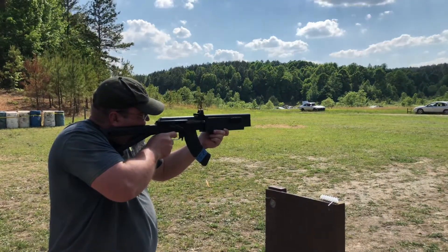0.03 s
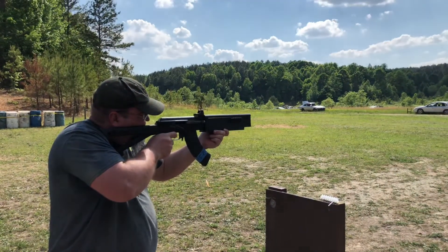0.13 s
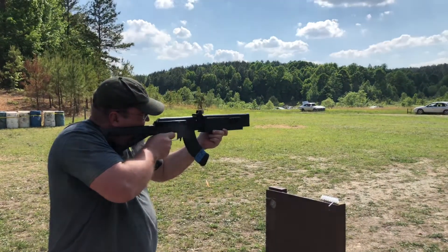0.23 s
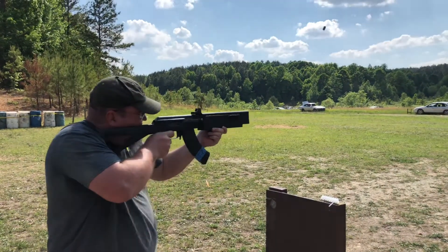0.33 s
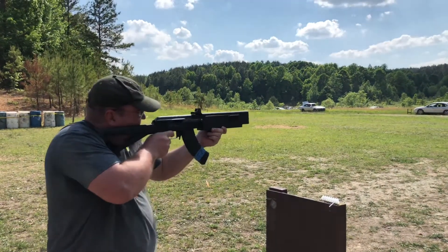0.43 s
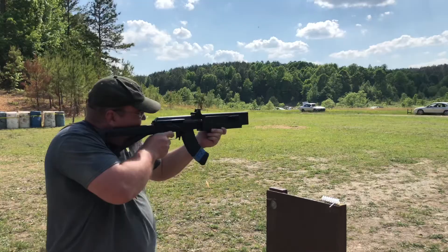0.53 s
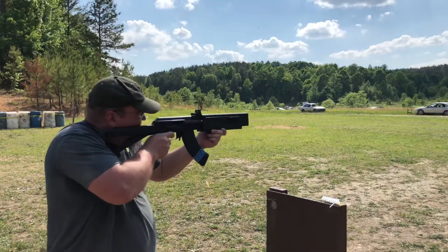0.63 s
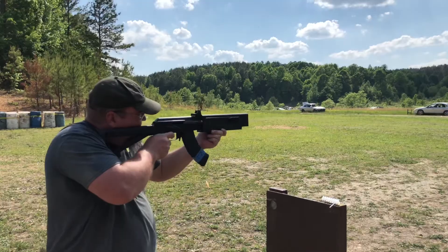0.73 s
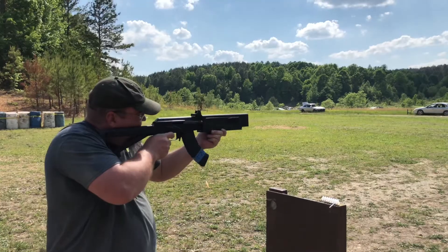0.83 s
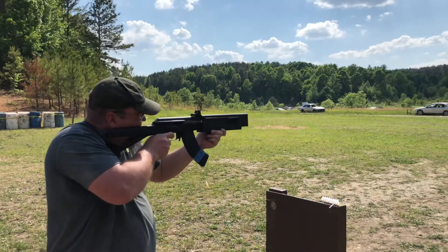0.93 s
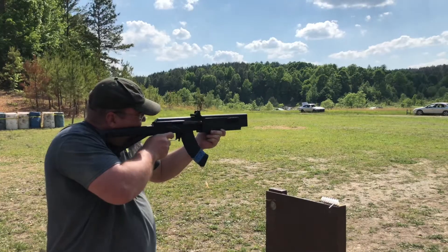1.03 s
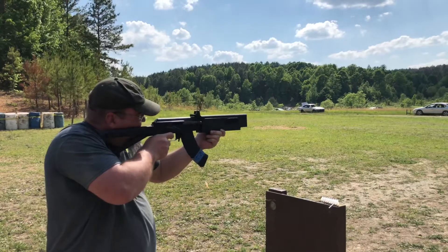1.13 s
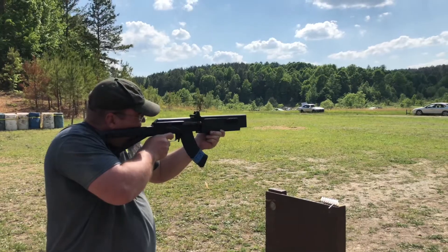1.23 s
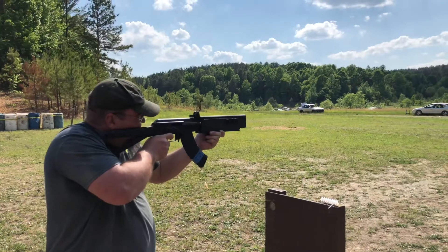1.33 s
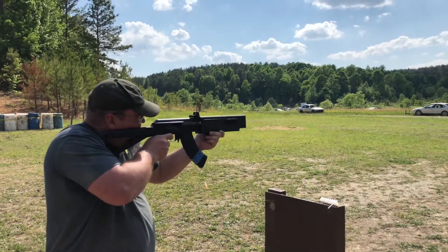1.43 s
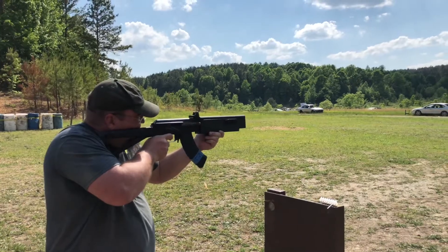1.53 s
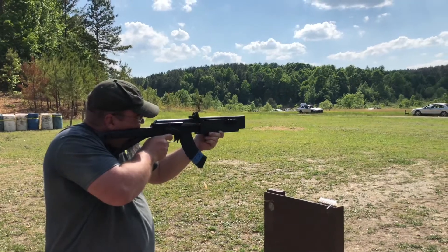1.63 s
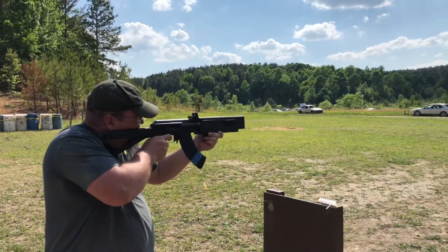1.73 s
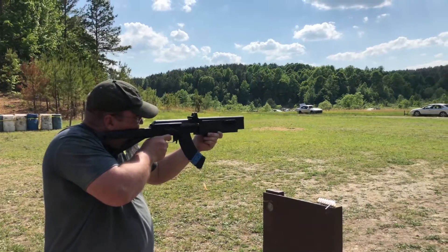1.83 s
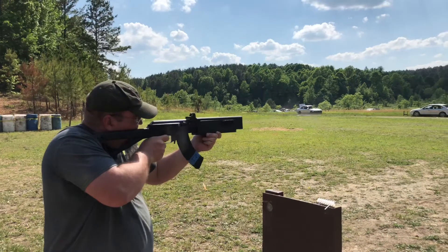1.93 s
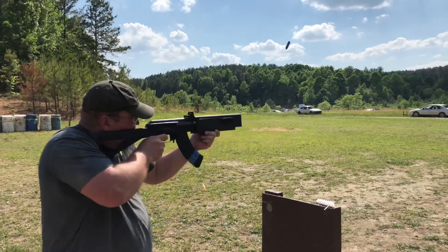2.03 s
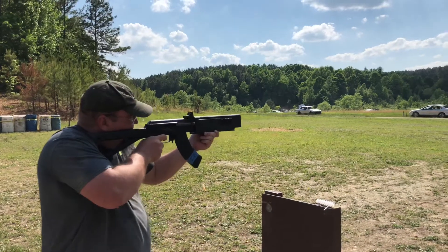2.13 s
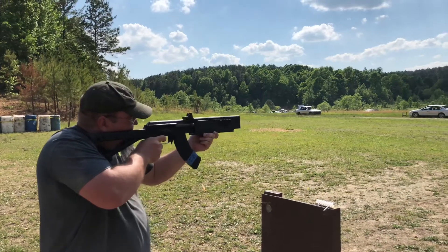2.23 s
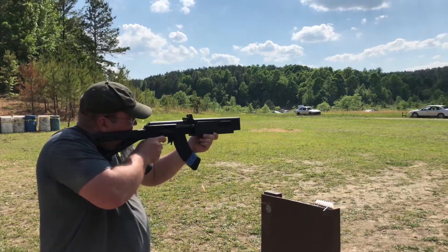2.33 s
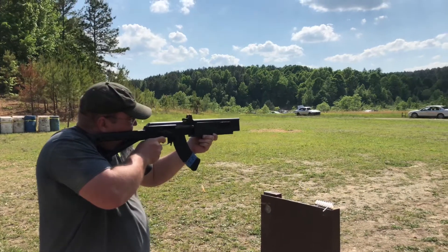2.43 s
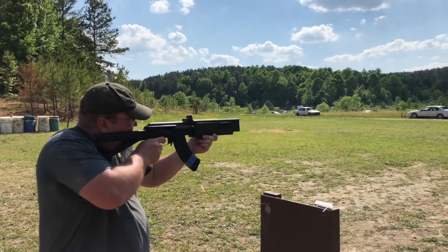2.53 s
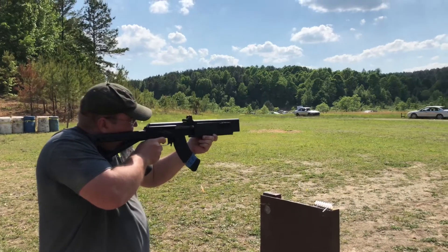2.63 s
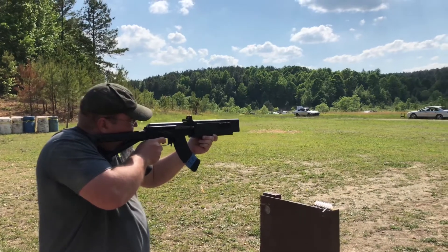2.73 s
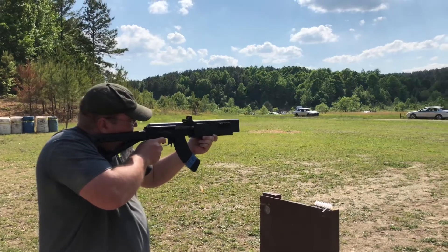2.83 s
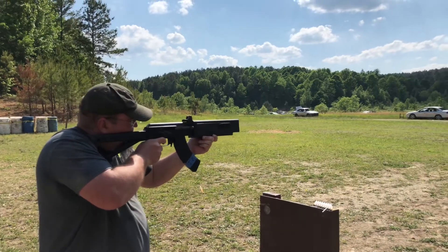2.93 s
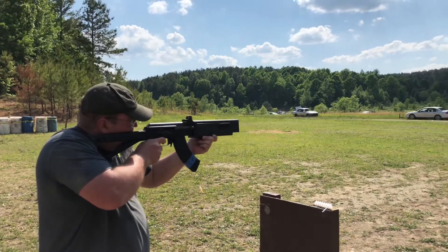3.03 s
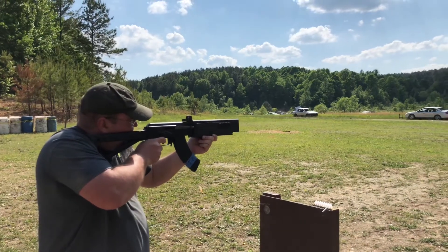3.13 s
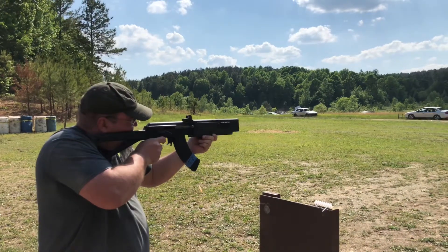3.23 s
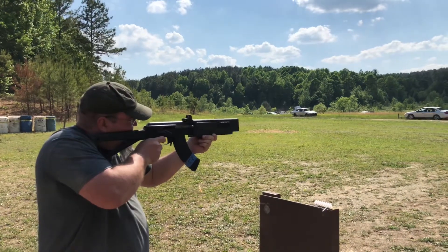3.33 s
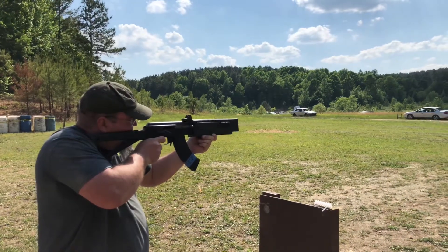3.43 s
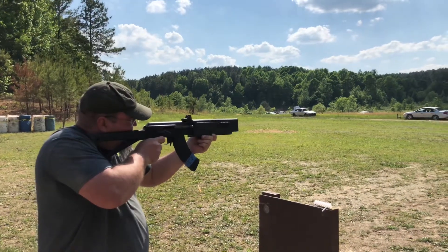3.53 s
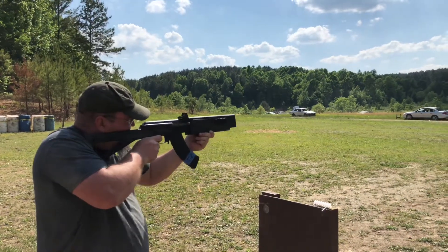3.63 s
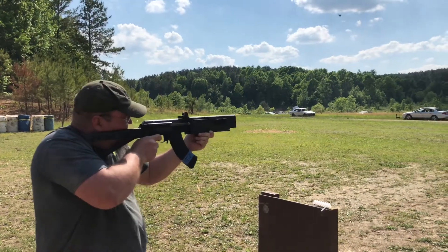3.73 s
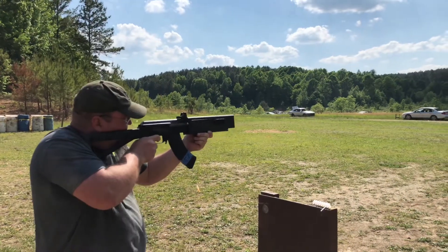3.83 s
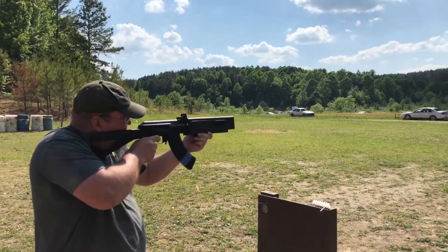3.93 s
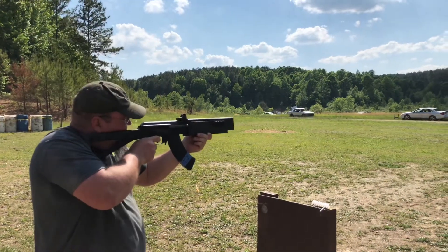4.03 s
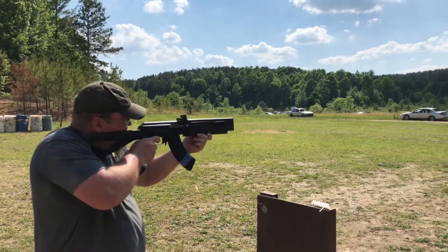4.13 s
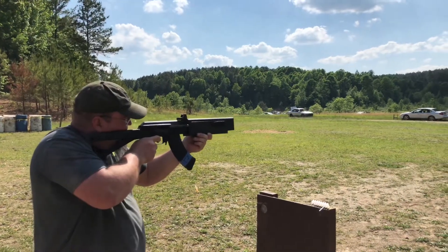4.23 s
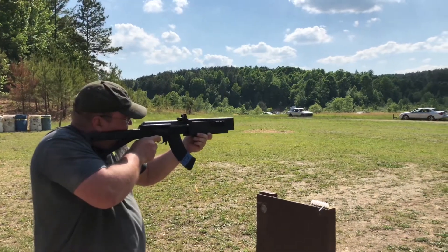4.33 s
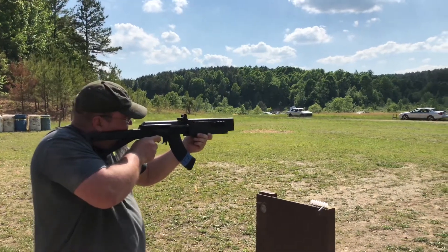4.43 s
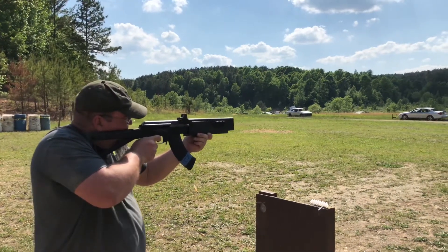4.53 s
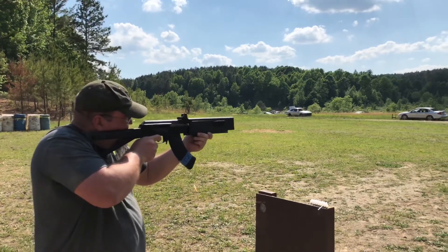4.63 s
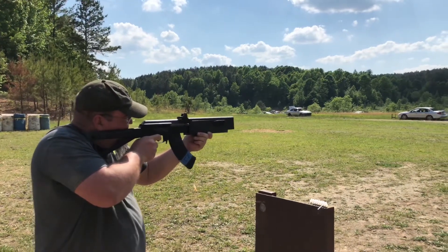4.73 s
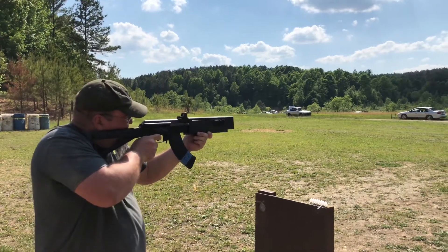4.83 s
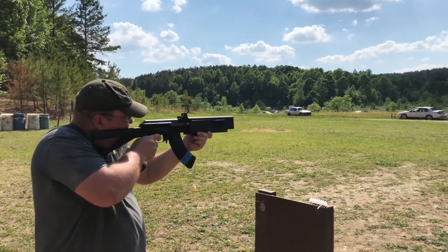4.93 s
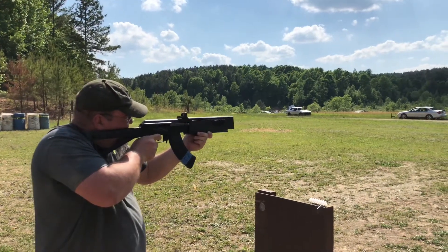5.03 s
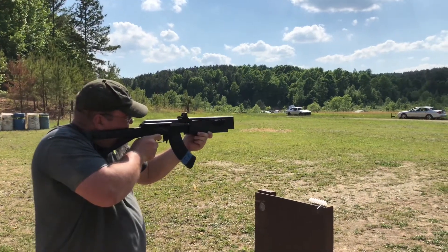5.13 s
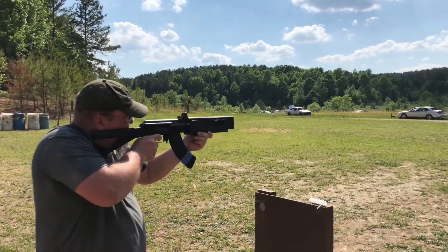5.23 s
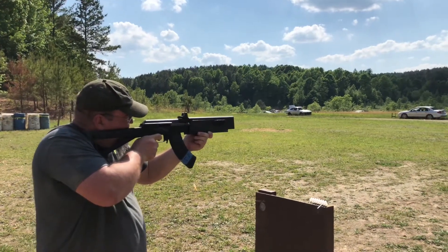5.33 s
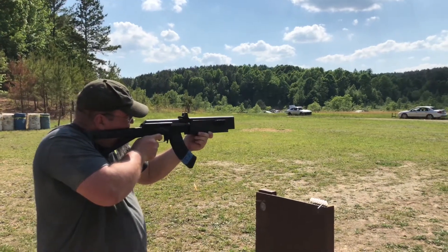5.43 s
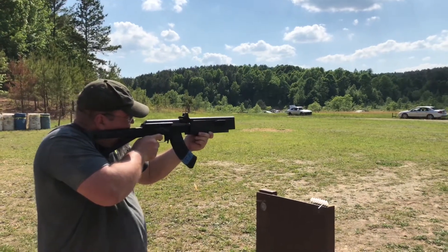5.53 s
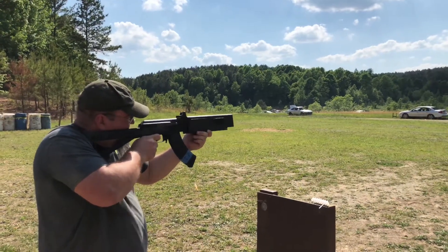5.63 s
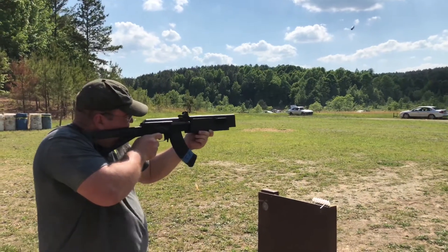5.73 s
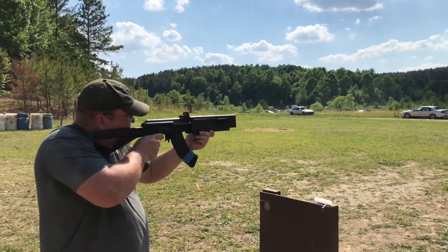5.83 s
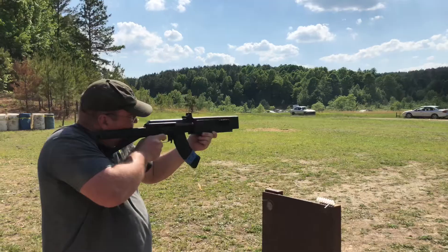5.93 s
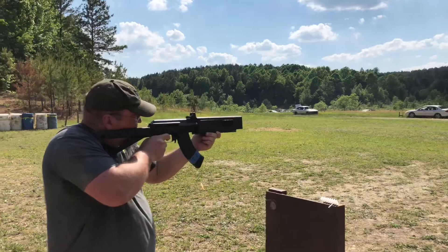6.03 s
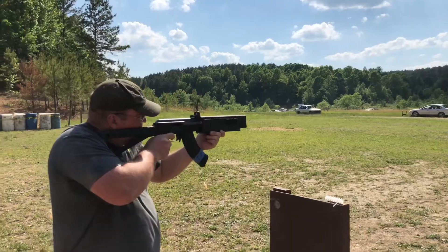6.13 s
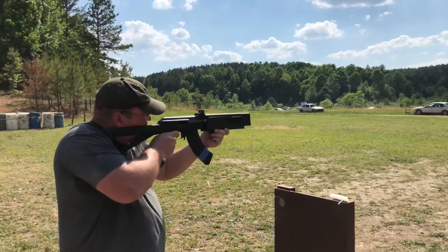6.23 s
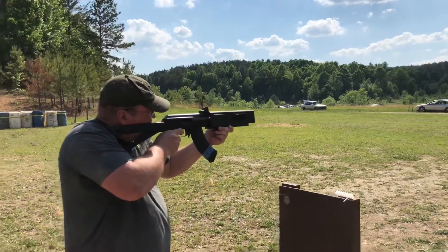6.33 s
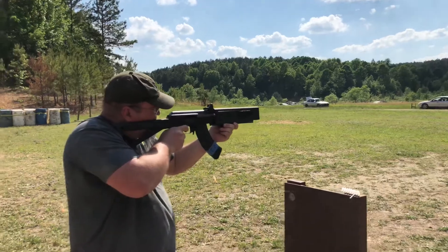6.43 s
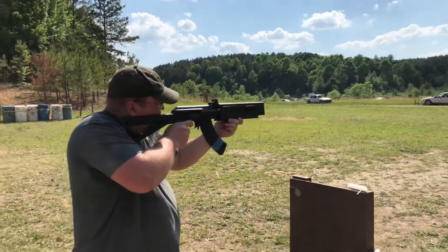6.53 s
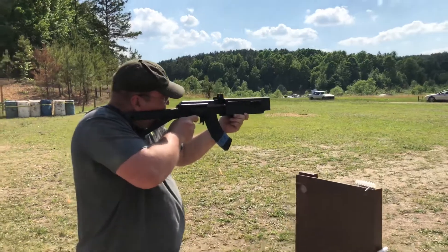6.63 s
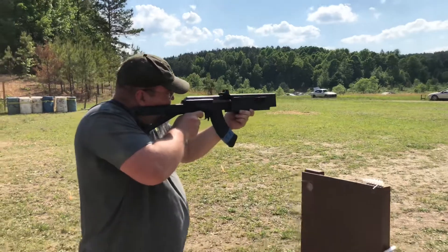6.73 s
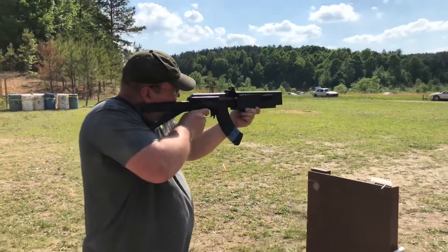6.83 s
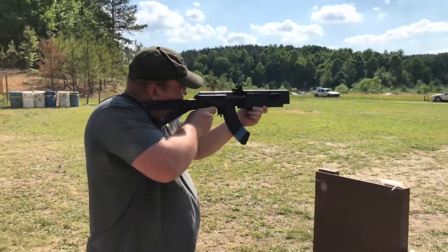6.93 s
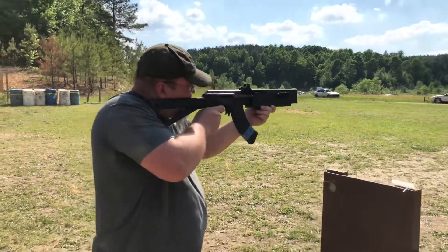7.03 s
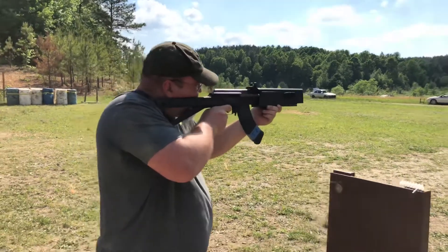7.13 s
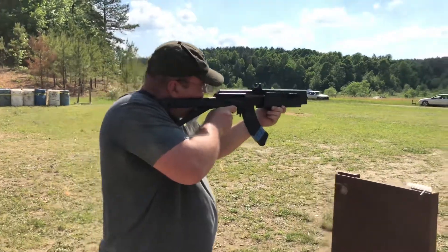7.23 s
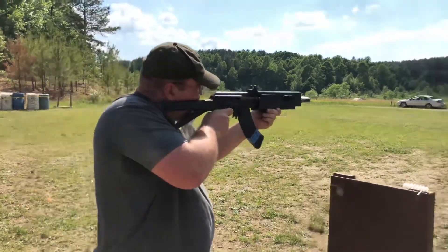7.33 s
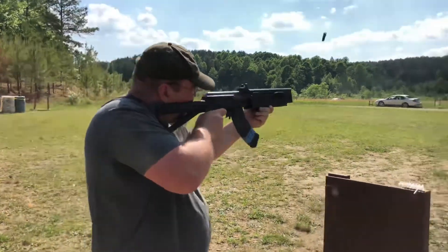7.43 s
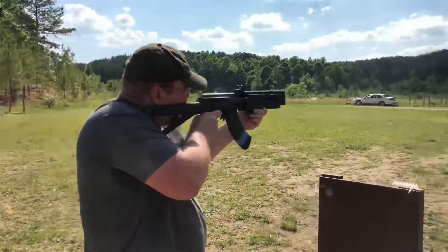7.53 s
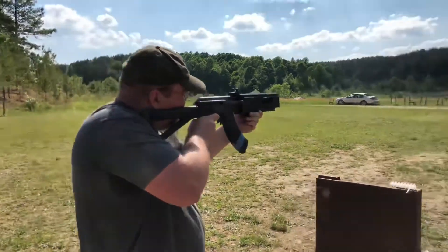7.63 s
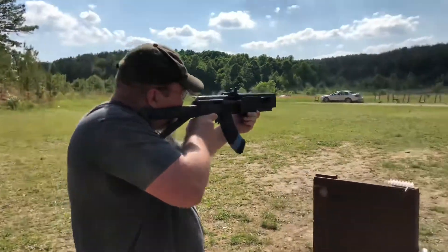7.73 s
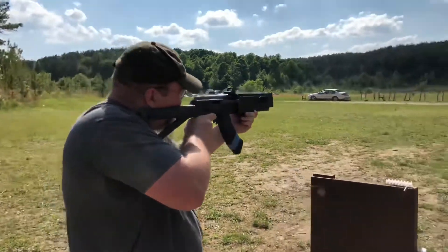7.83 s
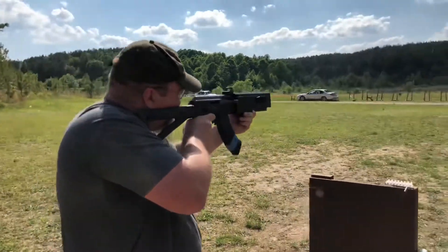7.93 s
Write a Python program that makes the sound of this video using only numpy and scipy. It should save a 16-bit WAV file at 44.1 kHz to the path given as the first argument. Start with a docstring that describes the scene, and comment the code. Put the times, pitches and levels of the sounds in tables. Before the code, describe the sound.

An open grassy range with quiet airy hiss, heard by one microphone near the shooter. Low wind buffets it unevenly, strongest at the start and around 5.4 s. A small bird gives quick, thin slurred whistles at 0-0.3 s and again, fainter, at 1.5-2 s. A suppressed self-loading rifle fires singly at 0.3, 2.0, 3.65, 5.7 and 7.45 s: a tiny hammer tick, a dry crack with a breathy gas burst and low push, then steel bolt clatter within a tenth of a second. A trigger click follows just after each shot. Bank and tree echoes slap and scatter over half a second; about 1.2 s later a wooded hill returns a dull, swelling roar, with sparse crackles and knocks before it. Spent cases ping thinly near 1.5 and 3.2 s, barely audible later. The last shot's echo is cut short at the end.

```python
"""Wind buffets the microphone as filtered noise and a small bird sings in gliding sines over a quiet field.
Then five single shots of a suppressed self-loading rifle: noise bursts for hammer, ignition, crack, gas and
bolt, a damped chamber ring and a low push. Scattered noise answers from a bank, the tree line and a far wooded
hill, with slaps, knocks and crackle. After each shot the trigger resets with a steel click; spent cases ping
on the ground as thin high sines with a tick."""
import sys
import numpy as np
from scipy import signal
from scipy.io import wavfile
from scipy.ndimage import map_coordinates

SR = 44100
rng = np.random.default_rng(int(sys.argv[2]) if len(sys.argv) > 2 else 0)


def generate_wav(sig):
    """Save sig (samples, or channels by samples) to the path in sys.argv[1] as 16-bit PCM at SR."""
    pcm = np.round(np.clip(np.atleast_2d(sig).T, -1, 1) * 32767).astype(np.int16)
    wavfile.write(sys.argv[1], SR, pcm)


N = 351918

# the shots: (time [s], crack trim [dB], suppressor ring trim [dB], hammer trim [dB], bolt trim [dB],
# near echo trim [dB], extra from the deep forest [dB], hill echo trim [dB], hill echo upper edge [Hz])
SHOTS = [(0.3185, -2, 3, 7.5, -2.5, 1.5, -1.5, 1, 1890), (2.0271, -1.64, 3.5, -1, -0.5, -2, 2.5, 0, 2467),
         (3.654, -3, 1.5, -3.5, -1.5, -2.5, 3.5, 1, 2370), (5.683, -3.5, -1, 3, -2.5, 0, .5, 0.5, 2440),
         (7.4577, -1.5, 3, -1.5, -1, -1, 2, 2, 2400)]
# colour of the action latching: (frequency [Hz], density [dB per Hz])
LATCH_TONE = [(100, -36), (400, -26), (700, -1), (1400, 3), (2400, -5.5), (3800, 7.5), (5200, -4.5),
              (6500, 3.5), (9000, 2), (12000, -2), (16000, -8)]

LEAD = .03  # s of each shot's sound ahead of its shot time, for the hammer and ignition
AGE = np.arange(int(2.7 * SR)) / SR - LEAD  # s after the shot
HILL_DELAY_S = 1.199


def rifle(crack_db, can_db, hammer_db, bolt_db):
    """One firing cycle: hammer, ignition, crack and gas, then the bolt back and home on ringing steel."""
    # bursts in firing order: (time after the shot [s], level before trims [dB], hold [s], decay time [s])
    hammer = [(-.0228, -32, .0015, 0.0015), (-.019, -36, .001, 0.0018), (-.0165, -30.5, .001, .002),
              (-.0132, -30.5, .002, 0.0042)]
    primer = [(-.0092, -42, .002, 0.0019), (-.007, -23, 0.0022, 0.0045)]
    crack = [(-.0014, -13.5, 0.0017, .001), (.0002, -3, 0.0018, 0.0017)]
    gas = [(.003, -9, 0.0035, .005), (.0105, -17.5, 0.0025, 0.0093)]
    bolt = [(.0275, -22.5, .004, .009), (.036, -34.5, .008, .01), (.044, -22, .006, 0.0086),
            (.0502, -24, 0.0024, .007), (.058, -21.5, .01, .008), (.092, -31.5, 0.0075, 0.065)]
    latch = [(.0695, -20, 0.01, .003), (.0742, -17, 0.0035, 0.0055), (.0795, -15.5, .0025, .0018)]
    # colours of the bursts: (frequency [Hz], density [dB per Hz])
    primer_tone = [(88, -39), (150, -0.5), (1600, -1), (2180, -3.5), (2980, -0.5), (4320, -9.5),
                   (5910, -6.5), (13200, -11.5), (16000, -16)]
    crack_tone = [(100, -26.5), (400, -14), (1250, -6), (2000, -13), (2800, -2.5), (3450, 2.5), (3900, -7),
                  (4450, 1), (5200, -5), (7000, -5.5), (8800, -0.5), (11000, -9.5), (16000, -13)]
    gas_tone = [(80, -4.5), (250, 1), (550, 4.5), (780, -2.5), (1050, 0.5), (1800, -13), (2400, -13.5),
                (5000, 2), (7000, -3), (9500, -0.5), (16000, -1)]
    bolt_tone = [(100, -14), (350, -12), (550, -4.5), (1000, -2.5), (1450, 4), (2000, -3.5), (3000, -0.5),
                 (4800, 2), (7500, -2), (11000, -4), (16000, -10)]

    muzzle = colour(bursts(crack), crack_tone) + colour(bursts(gas), gas_tone) + thump()
    ignition = colour(bursts(primer), primer_tone)
    blows = amp(hammer_db) * bursts(hammer) + amp(bolt_db) * bursts(bolt)
    sliding = colour(rattle(blows), bolt_tone)
    latching = colour(rattle(amp(bolt_db) * bursts(latch)), LATCH_TONE)
    action = amp(0.9) * steel(sliding, ring_db=-14) + amp(-3.0) * steel(latching, ring_db=-14)
    return amp(crack_db) * muzzle + amp(can_db) * suppressor() + ignition + action


def suppressor(size=1024):
    """Puffs of gas ring the short, strongly damped chambers of the can."""
    # puffs: (time after the shot [s], level before trim [dB], hold [s], decay time [s])
    puff_times = [(.0012, -35, .001, 0.0011), (.006, -20, .001, .001), (.0098, -15, .0025, .0015),
                  (.0155, -20.5, .002, 0.0028)]
    # chamber resonances: (frequency [Hz], bandwidth [Hz], relative level [dB])
    chambers = [(2570, 260, 3), (2830, 590, 10.5), (3130, 420, -6)]
    t, puffs = np.arange(size) / SR, bursts(puff_times)
    ring = sum(amp(db) * np.exp(-np.pi * width * t) * np.sin(2 * np.pi * hz * t)
               for hz, width, db in chambers)
    rung = signal.oaconvolve(puffs, ring)[:len(puffs)]
    return evened(rung) * puffs.std()


def thump(level_db=-20, size=16384):
    """The gas cloud swells and rebounds: a low push that falls in pitch."""
    start_hz, end_hz, sag_s = 125, 20, .024
    delay_s, swell_s, decay_s = .0088, .0015, .013
    t = np.maximum(AGE[:size] - delay_s, 0)
    turns = end_hz * t + (start_hz - end_hz) * sag_s * (1 - np.exp(-t / sag_s))
    envelope = (1 - np.exp(-t / swell_s)) * np.exp(-t / decay_s)
    return amp(level_db) * envelope * np.sin(2 * np.pi * turns)


def bursts(rows, size=16384):
    """Turbulent bursts within one shot: each starts at once, holds and dies away."""
    t = AGE[:size]
    power = 0
    for s, db, hold, decay in rows:
        level = amp(db) * np.exp(-np.maximum(t - s - hold, 0) / decay)
        power = power + (t >= s) * level ** 2
    return np.sqrt(power) * rng.choice([-1., 1.], size)


def rattle(x, grain_db=2.5):
    """Sliding steel catches and slips hundreds of times a second."""
    return x * evened(amp(grain_db * wander(len(x), 700)))


def steel(blows, ring_db, size=8192):
    """Blows of the action with the steel receiver ringing after them."""
    # receiver modes: (frequency [Hz], relative level [dB], t60 [s])
    modes = [(1560, 3, .06), (2650, -4, .08), (3080, -3, 0.13), (3750, 1, 0.059), (4160, -7, .2),
             (4870, -1, 0.092), (6300, 1.5, .08), (6430, 7, 0.057), (8800, 4, 0.05), (11400, -9, .06)]
    t = np.arange(size) / SR
    ring = sum(amp(db - 60 * t / t60) * np.sin(2 * np.pi * (hz * t + rng.random()))
               for hz, db, t60 in modes)
    return blows + amp(ring_db) * signal.oaconvolve(blows, ring / np.linalg.norm(ring))[:len(blows)]


def resets():
    """The trigger is let forward and the sear snaps back with a short steel click."""
    # clicks: (time [s], burst level before colouring [dB])
    clicks = [(0.466, -28), (2.160, -23), (3.7963, -25.5), (5.799, -24), (7.569, -23)]
    out = np.zeros(N)
    for s, db in clicks:
        click = colour(rattle(bursts([(0.00094, db, 0.0031, 0.0043)])), LATCH_TONE)
        add(out, s - LEAD, steel(click, ring_db=-21))
    return out


def echoes(near_db, deep_db, hill_db, edge_hz):
    """Bank, tree line and hill answer in turn; the longer the path, the more treble the air takes."""
    air_db, air_power = 0.64, 1.585  # loss per second at 1 kHz, and its growth with frequency
    shade_db_per_s, sink_per_s = 16, .55
    hz, t, (near, hill) = signal.stft(np.array([near_echoes(), hill_echo()]), SR, nperseg=256)
    hz = hz[:, None]
    # later answers come from deeper in the forest, so the hill's roar dulls as it rolls on
    edge = edge_hz * np.exp(-sink_per_s * (t - 1.5))
    above_edge = 1 - 1 / (1 + (hz / edge) ** 8)
    hill = hill * amp(hill_db - above_edge * shade_db_per_s * np.maximum(t - HILL_DELAY_S, 0))
    near = near * amp(near_db + deep_db * np.minimum(t / 0.52, 1))
    air_loss = amp(-air_db * t * (hz / 1000) ** air_power)
    return signal.istft((near + hill) * air_loss, SR, nperseg=256)[1]


def near_echoes():
    """Earth bank and stands of trees scatter the shot; hard faces near the tree line slap sharply."""
    # faces of the bank: (echo delay [s], level [dB], steepness [power of travel time])
    faces = [(0.131, -23.5, 7.3), (.165, -28.5, 3.7), (0.288, -40, 1.4)]
    # stands of trees, near to far: (echo delay [s], level [dB])
    stands = [(.085, -37), (.138, -30), (.203, -27.5), (.325, -38), (0.439, -47.5), (0.771, -47.5),
              (1.1, -50)]
    # what each reflector sends back: (frequency [Hz], density [dB per Hz])
    bank_tone = [(30, -24.5), (70, -18.5), (200, -8), (330, -10), (560, -3.5), (750, -0.5), (1060, 0.5),
                 (1500, -2), (2200, -9.5), (5000, -11.5), (16000, -24)]
    trees_tone = [(60, -16), (400, -13.5), (800, -5.5), (1800, -4), (2500, 1), (3300, -2), (4500, -8),
                  (7000, -8), (10000, -14), (16000, -13)]
    # slaps: (time after the shot [s], level before colouring [dB], hold [s], decay time [s])
    slaps = [(.1405, -19, .001, .001), (.199, -19, .0002, .0003), (.2025, -21, .0008, .001),
             (.2095, -19, .0015, .0008), (.214, -23, .0003, .0005), (.2175, -24, .0004, .0006),
             (.257, -33, .003, .003)]
    bank = sum(answer(*face) for face in faces)
    trees = sum(answer(*stand, steepness=3.13) for stand in stands)
    near = scatter(bank, bank_tone, grain_db=2, flutter_db=1, lump_db=.3)
    near += scatter(trees, trees_tone, grain_db=2, flutter_db=1.4, lump_db=.5)
    slap_tone = [(100, -1.0), (900, -9.5), (2900, 7), (6000, 0), (16000, -16)]
    add(near, 0, colour(bursts(slaps), slap_tone))
    add(near, .125, amp(-19.0) * thump())  # the bank returns the low push too
    return near


def answer(delay, db, steepness):
    """Power of one reflector's echo: it builds up to its delay, then fades as the paths grow longer."""
    depth = 0.15  # share of its delay over which an echo builds up
    path = np.maximum(AGE, 0) / delay
    rise = np.clip(1 + (path - 1) / depth, 0, 1)
    return (amp(db) * rise / np.maximum(path, 1) ** steepness) ** 2


def hill_echo():
    """The wooded hill scatters the shot back as one long roar."""
    # what the hill sends back: (frequency [Hz], density [dB per Hz])
    hill_tone = [(60, -16.5), (400, -21), (700, -10), (950, -3.5), (1450, -2), (2100, -2), (3000, -6.5),
                 (5000, -7.5), (8000, -15.5), (16000, -37.5)]
    return scatter(roar(), hill_tone, grain_db=2.6, flutter_db=1, lump_db=.3)


def roar():
    """Power of the hill's echo: it swells as more of the slope answers, holds and dies away."""
    rise_s, hold_s, fall_db_per_s, level_db = 0.23, .2, 7, -38.5
    t = AGE - HILL_DELAY_S
    swell = np.clip(t / rise_s, 0, 1) ** 1.47
    return swell * amp(level_db - fall_db_per_s * np.maximum(t - rise_s - hold_s, 0)) ** 2


def scatter(power, tone, grain_db, flutter_db, lump_db, snap_db=17, snaps_per_s=45):
    """Countless small reflections, uneven in size and clumped in time; a few stand out as snaps."""
    count = len(AGE)
    grain, flutter = grain_db * wander(count, 700), flutter_db * wander(count, 45)
    sizes = evened(amp(grain + flutter + lump_db * wander(count, 12)))
    snaps = amp(snap_db) * (rng.random(count) < snaps_per_s / SR)
    fade = np.minimum((AGE[-1] - AGE) / .5, 1)
    return colour(np.sqrt(power * fade) * evened(sizes * rng.standard_normal(count) + snaps), tone)


def knocks():
    """Far hard faces slap and single trunks crackle after every shot; lone knocks sound downrange."""
    # lone knocks: (time [s], level before colouring [dB], frequency [Hz])
    lone_knocks = [(1.437, -41, 2167), (3.126, -36.5, 2140), (4.924, -39, 2208), (6.783, -47, 2500),
                   (7.137, -36, 1920)]
    # slaps off far faces: (time after the shot [s], level before colouring [dB], frequency [Hz])
    far_slaps = [(.73, -48.5, 5200), (.795, -49, 3500), (.845, -45.5, 2780)]
    drift_s = 0.015  # the wind shifts the slaps' arrival from shot to shot
    ticks_per_shot, from_s, to_s = 6, 0.6, 1.15
    crackle_db, spread_db, low_hz, high_hz = -50, 11.0, 2385, 5970
    out = np.zeros(N)
    for s, db, hz in lone_knocks:
        add(out, s, knock(db, hz))
    for shot_s, *_ in SHOTS:
        for delay, db, hz in far_slaps:
            add(out, shot_s + delay + drift_s * rng.uniform(-0.92, 1), knock(db, hz))
        for far, bright in rng.random((ticks_per_shot, 2)):
            delay = from_s + far * (to_s - from_s)
            hz = low_hz * (high_hz / low_hz) ** bright
            db = crackle_db + spread_db * (1 - 2 * bright)  # brighter ticks are softer
            add(out, shot_s + delay, knock(db, hz, decay=0.008))
    return out


def knock(db, hz, decay=0.0081, size=4096):
    """A short knock, blurred and dulled by distance."""
    puff = amp(db) * np.exp(-np.arange(size) / SR / decay) * rng.standard_normal(size)
    return colour(puff, [(hz / 4, -18), (hz, 0), (hz * 1.3, -9), (hz * 3.1, -36), (hz * 6, -70)])


def cases(size=8192):
    """A spent case lands with a tick and one thin, high ring."""
    # landings: (time [s], level of tick and ring together before their own trims [dB], ring [Hz], t60 [s])
    landings = [(1.5115, -33.5, 12880, .066), (3.2011, -39, 13220, 0.066), (4.7877, -61.5, 12250, 0.13),
                (5.1657, -55.5, 12250, 0.093), (6.8006, -54.5, 12920, .015)]
    tick_tone = [(2000, -25), (8000, -12), (13000, 0), (16000, -2)]
    t, out = np.arange(size) / SR, np.zeros(N)
    for s, db, hz, t60 in landings:
        tick = colour(np.exp(-t / 0.00083) * rng.standard_normal(size), tick_tone)
        ring = amp(-8.0 - 60 * t / t60) * np.sin(2 * np.pi * hz * t)
        add(out, s, amp(db) * (ring + amp(-9) * tick))
    return out


def bird(buzz_hz=190, wet_db=-12, echo_s=.08, size=16384):
    """Thin slurred whistles that swell and fade, some with a buzz in pitch, with an echo from the trees."""
    # slurs: (time [s], length [s], start [Hz], end [Hz], level [dB],
    # bend [above 0 the glide is quick at first, below 0 at last], buzz depth [0-1 of the pitch])
    slurs = [(0, 0.011, 6060, 7450, -49, -1, 0), (.008, 0.017, 5300, 7660, -49.5, -0.5, 0),
             (.023, .027, 5700, 2560, -48.5, -2.5, 0.0053), (.057, 0.11, 2350, 4183, -50.5, 8, 0.0056),
             (.13, .19, 4195, 4210, -64, -3.5, 0), (.238, 0.058, 7200, 7100, -53, 1.5, .07),
             (.274, 0.033, 7100, 5240, -52, 1, 0.012), (1.485, 0.041, 5550, 6700, -59, 0.5, 0.0092),
             (1.605, .018, 5500, 8400, -58.5, -3.5, 0.012), (1.628, 0.068, 7600, 5570, -62, 2, 0.012),
             (1.748, 0.038, 5200, 4650, -56.5, 0.5, 0.011), (1.89, 0.015, 5600, 7900, -59.5, 0.5, 0.0022),
             (1.91, 0.067, 7600, 5460, -59, 3.5, 0.007)]
    out = np.zeros(N)
    for s, length, start_hz, end_hz, db, bend, buzz in slurs:
        t = np.arange(0, length, 1 / SR)
        speed = np.exp(-bend * t / length)
        glide = start_hz + (end_hz - start_hz) * np.cumsum(speed) / speed.sum()
        pitch = glide * (1 + buzz * np.sin(2 * np.pi * buzz_hz * t))
        level = amp(db + 2.5 * wander(len(t), 40)) * np.sin(np.pi * t / length) ** .7
        add(out, s, level * np.sin(2 * np.pi * np.cumsum(pitch) / SR))
    tail = rng.standard_normal(size) * np.exp(-np.arange(size) / SR / echo_s)
    return out + amp(wet_db) * signal.oaconvolve(out, tail / np.linalg.norm(tail))[:N]


def wind(rumble_db=-0.5, deep_db=0.5, flutter_db=-15):
    """Eddies rumble on the microphone; the strongest reach higher as flutter."""
    # strength of the wind before the layer trims: (time [s], level [dB])
    strength = [(0.0, -34.5), (0.32, -36), (1.1, -71), (1.18, -52.5), (1.42, -60.5), (2.02, -49),
                (2.68, -63.5), (2.84, -54.5), (2.96, -74.5), (3.08, -40), (3.24, -40), (3.96, -50),
                (4.16, -66.5), (4.44, -43.5), (4.5, -77.5), (4.68, -43.5), (4.78, -50.5), (5.42, -31.5),
                (6.48, -69.5), (6.56, -52), (7.0, -51.5), (7.1, -41.5), (7.26, -43), (7.34, -65),
                (7.54, -58), (7.96, -71)]
    # brightness, the flutter raised and the deepest bass lowered by this much: (time [s], level [dB])
    brightness = [(0, 6), (1.1, 14), (1.6, 8), (2.6, -7), (3.3, 1), (4.3, -3.5), (5.4, 1), (6.6, -3),
                  (7.25, -5.5), (7.7, 8)]
    # colour of the rumble: (frequency [Hz], density [dB per Hz])
    rumble_tone = [(15, -43), (30, -15.5), (50, 1), (75, 3.5), (135, 4), (225, -3), (320, -13),
                   (450, -27.5), (700, -43), (1500, -81)]
    flutter_tone = [(80, -10.5), (200, 1.5), (330, 0.5), (520, -9.5), (1000, -35.0), (3000, -62)]
    clock = np.arange(N) / SR
    level = amp(np.interp(clock, *np.transpose(strength)))
    tilt = amp(np.interp(clock, *np.transpose(brightness)))
    eddies = evened(amp(4.5 * np.tanh(wander(N, 26))))  # lurches of up to 4.5 dB either way
    rumble = colour(eddies * rng.standard_normal(N), rumble_tone)
    deep = signal.sosfiltfilt(signal.butter(2, 110, fs=SR, output="sos"), rumble)
    flutter = colour(evened(eddies ** 2) * rng.standard_normal(N), flutter_tone)
    tilted = rumble - deep + amp(deep_db) * deep / tilt
    return level * (amp(rumble_db) * tilted + amp(flutter_db) * tilt * flutter)


def buffets(swell_s=.0045, size=16384):
    """Single eddies strike the microphone as short, dull bumps."""
    # strikes: (time [s], peak level [dB], upper edge [Hz])
    strikes = [(0.023, -31.5, 462), (0.067, -35.5, 420), (0.116, -32, 484), (0.138, -34.5, 420),
               (0.199, -32, 420.6), (0.221, -23.5, 318), (0.252, -28, 420), (0.766, -32.5, 300),
               (1.23, -45.5, 250), (1.345, -42, 250), (1.67, -42, 302), (1.765, -44, 302),
               (3.26, -30.5, 480), (3.338, -31, 250), (3.519, -33.5, 332), (4.376, -29.5, 248),
               (4.659, -40, 220), (4.91, -30.5, 201), (5.107, -29, 280), (5.332, -28.5, 160),
               (5.437, -22.5, 198.7), (6.721, -29.5, 185.6), (7.101, -32.5, 149), (7.151, -26.5, 260)]
    u, out = np.arange(size) / SR / swell_s, np.zeros(N)
    for s, db, hz in strikes:
        tone = [(hz / 12, -24), (hz / 1.4, -1), (hz, -1.5), (hz * 2, -17), (hz * 7, -70)]
        eddy = colour(u * np.exp(1 - u) * rng.standard_normal(size), tone)
        add(out, s, amp(db) * eddy / abs(eddy).max())
    return out


def open_field():
    """The quiet air of the open field: steady coloured noise."""
    # colour of the air: (frequency [Hz], density [dB per Hz])
    air_tone = [(30, -4), (300, -5), (1000, -5), (2000, -10), (5000, -1.5), (8000, -18.5), (11000, -24.5),
                (16000, -38)]
    return amp(-68) * colour(rng.standard_normal(N), air_tone)


def amp(db):
    """Decibels to gain."""
    return 10 ** (np.asarray(db) / 20)


def evened(x):
    """Scales to rms 1."""
    return x / np.sqrt(np.mean(x ** 2) + 1e-20)


def add(mix, s, sound):
    """Mixes a sound in at time s."""
    part = mix[max(round(s * SR), 0):][:len(sound)]
    part += sound[:len(part)]


def colour(x, tone, size=8192):
    """Causal minimum-phase filter of unit energy with the given spectrum."""
    hz, db = np.transpose(tone)
    bins = np.log(abs(np.fft.fftfreq(size, 1 / SR)) + 1)
    log_gain = np.log(amp(np.interp(bins, np.log(hz), db)))
    taps = np.fft.ifft(np.exp(np.conj(signal.hilbert(log_gain)))).real[:size // 2]
    return signal.oaconvolve(x, taps / np.linalg.norm(taps))[:len(x)]


def wander(count, hz):
    """Random drift of rms 1 that moves up to hz times a second, in straight lines between points."""
    at = np.arange(count) * 2 * hz / SR
    return evened(map_coordinates(rng.standard_normal(count), [at], order=1, mode="nearest"))


def scene():
    """The shots and their echoes over the quiet field."""
    out = resets() + knocks() + cases() + bird() + wind() + buffets() + open_field()
    for s, crack_db, can_db, hammer_db, bolt_db, near_db, deep_db, hill_db, edge_hz in SHOTS:
        add(out, s - LEAD, rifle(crack_db, can_db, hammer_db, bolt_db))
        add(out, s - LEAD, echoes(near_db, deep_db, hill_db, edge_hz))
    return out[None]


def record(dry):
    """The microphone drops the deepest bass, the loudest peaks round off at full scale; then the band limit."""
    heard = signal.sosfilt(signal.butter(2, 30, "high", fs=SR, output="sos"), dry)
    held = heard / (1 + heard ** 6) ** (1 / 6)
    band_limit = signal.firwin(1023, 15980, window=("kaiser", 9), fs=SR)
    return signal.oaconvolve(held, band_limit[None], "same")


dry = scene()
out = record(dry)
generate_wav(out)
```